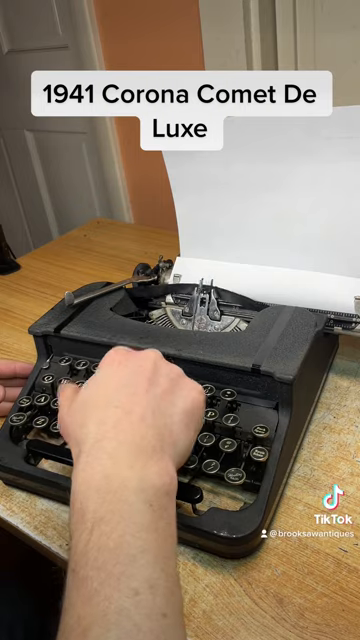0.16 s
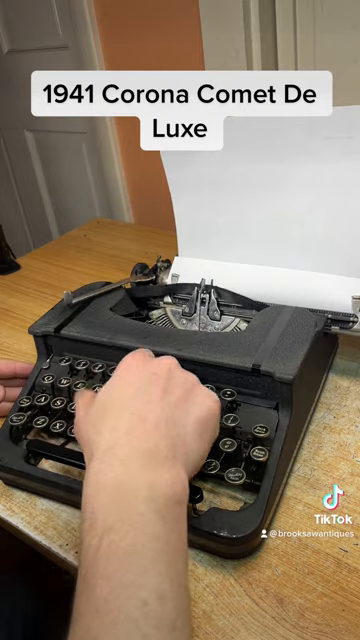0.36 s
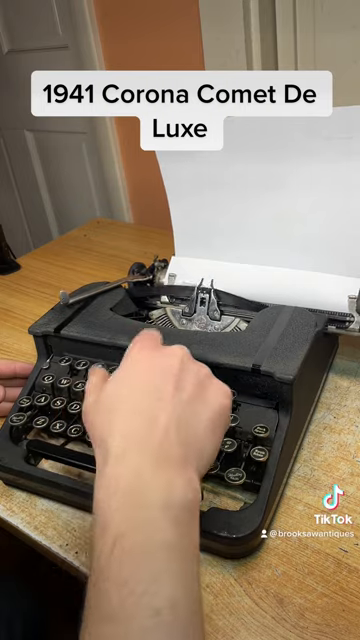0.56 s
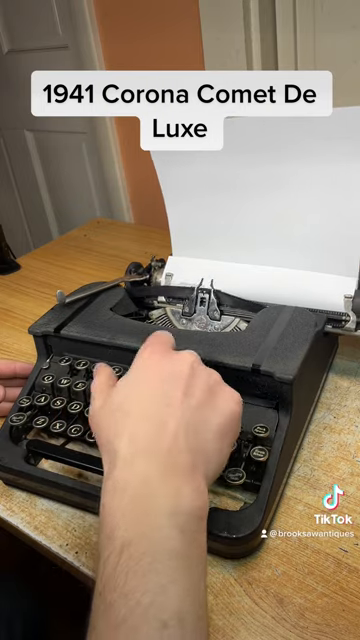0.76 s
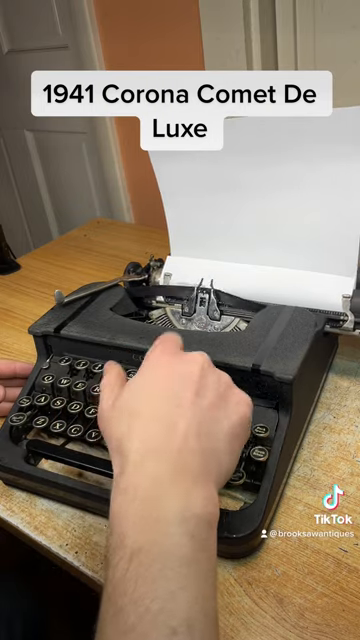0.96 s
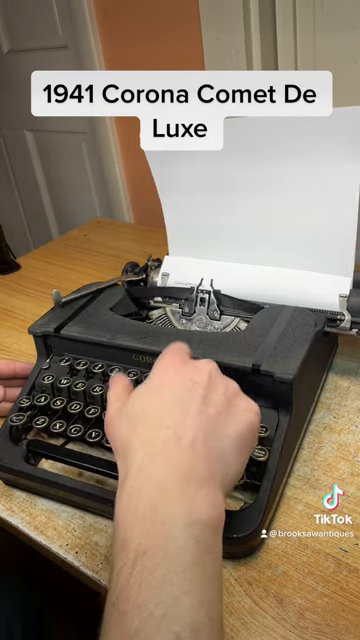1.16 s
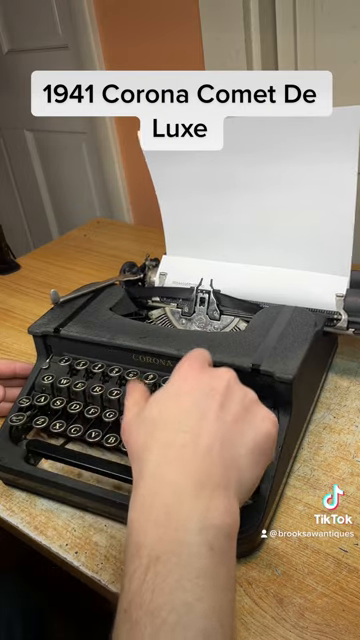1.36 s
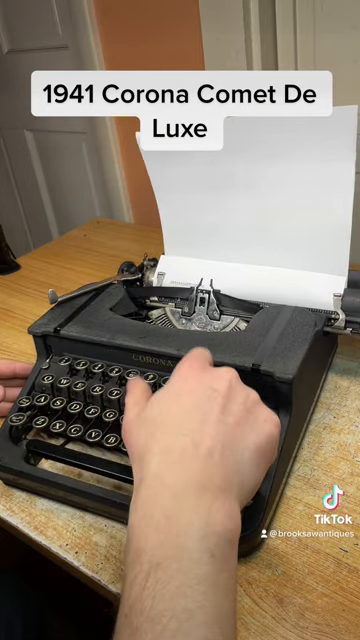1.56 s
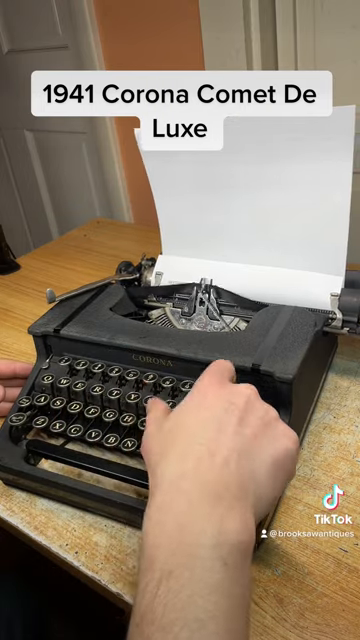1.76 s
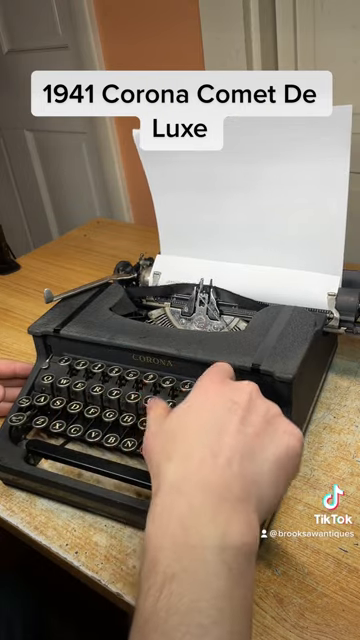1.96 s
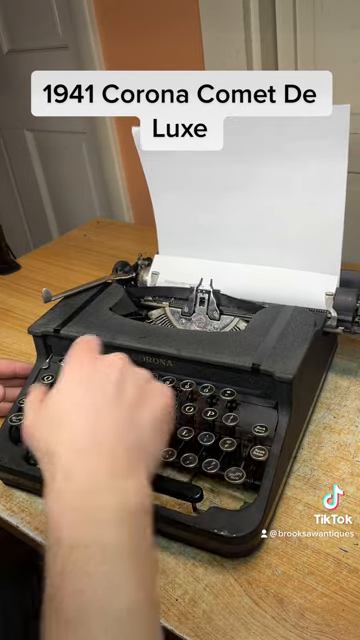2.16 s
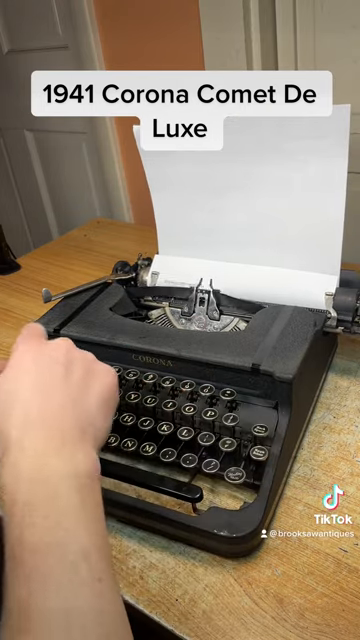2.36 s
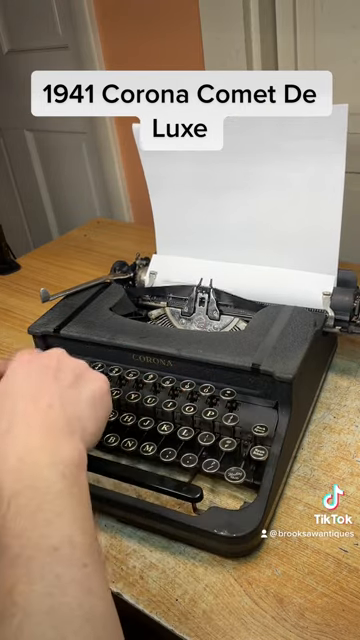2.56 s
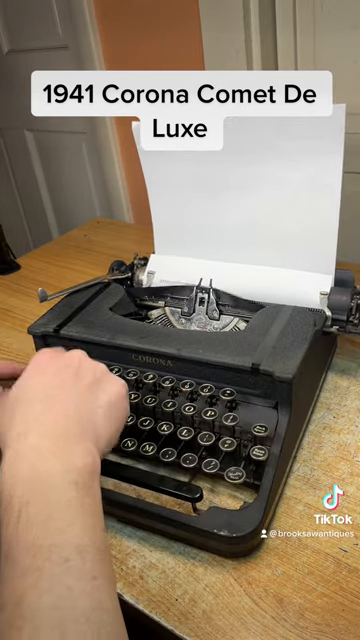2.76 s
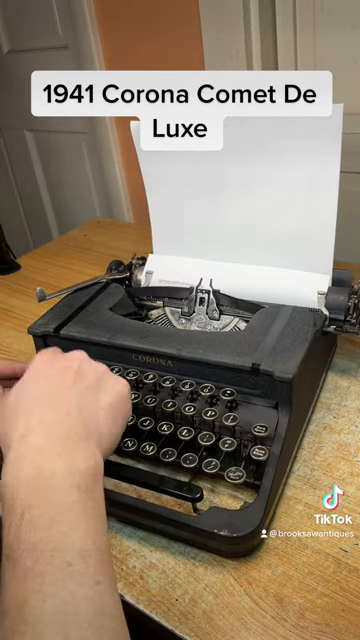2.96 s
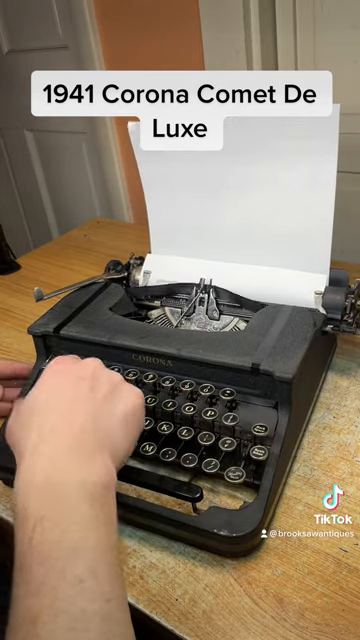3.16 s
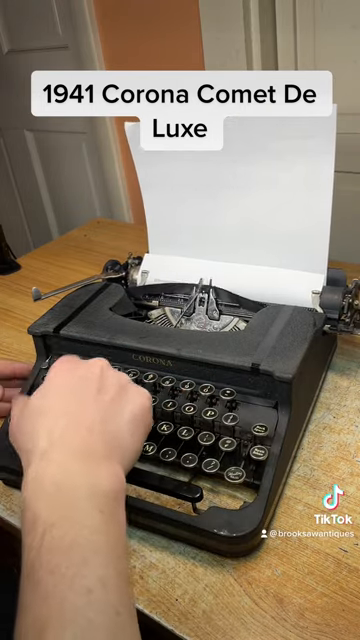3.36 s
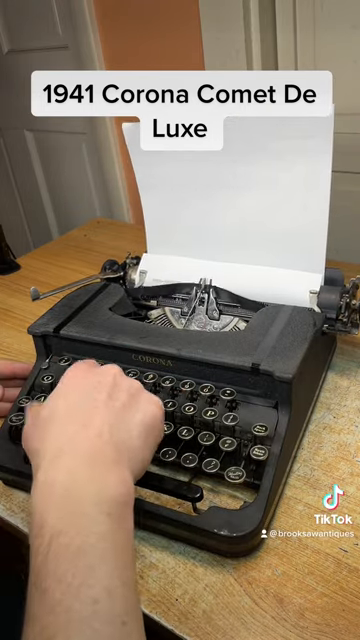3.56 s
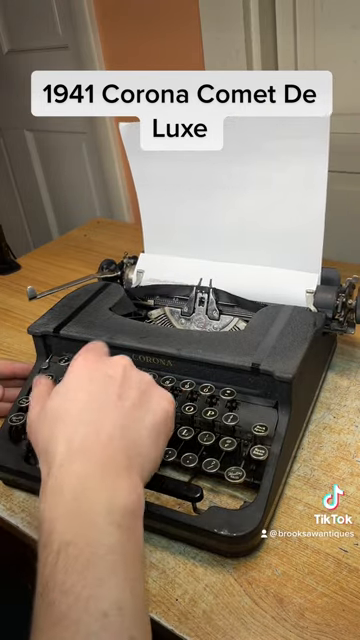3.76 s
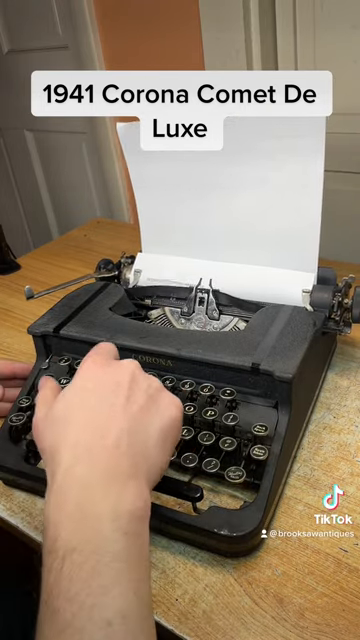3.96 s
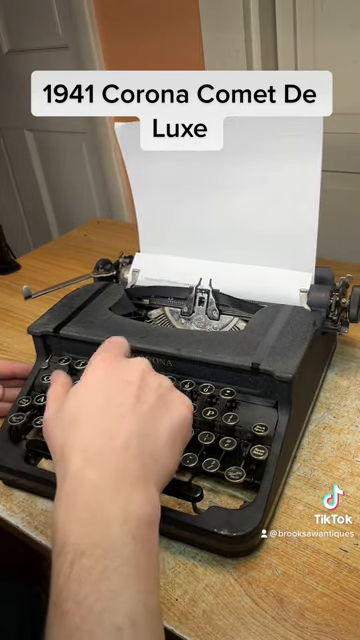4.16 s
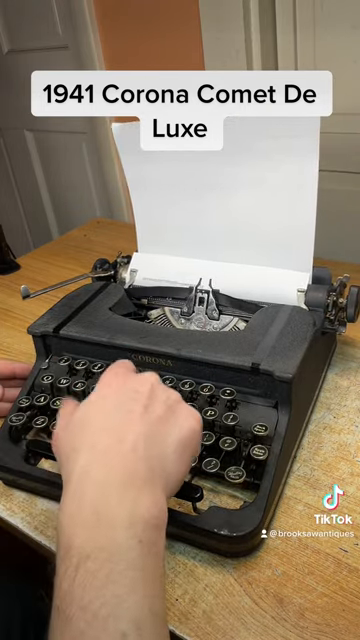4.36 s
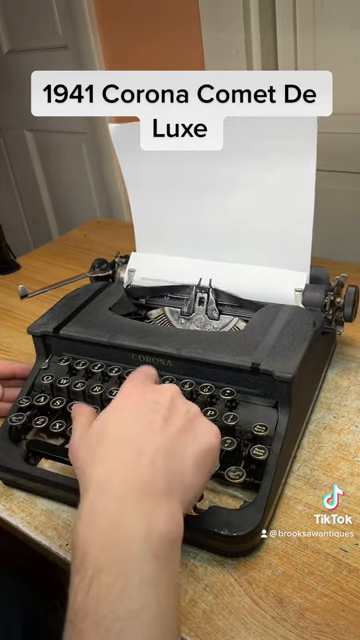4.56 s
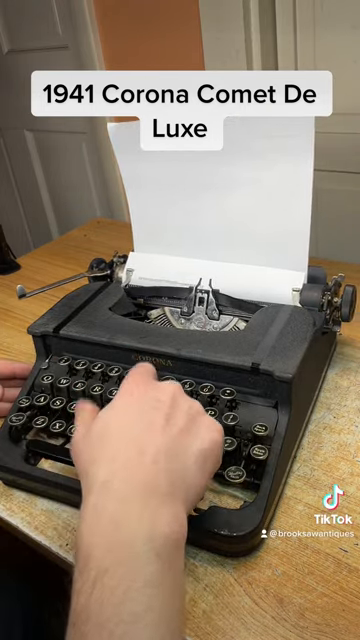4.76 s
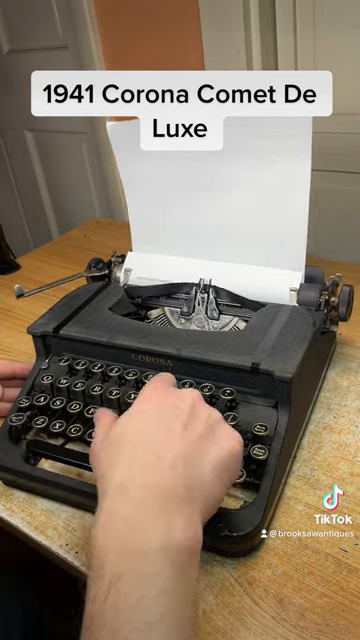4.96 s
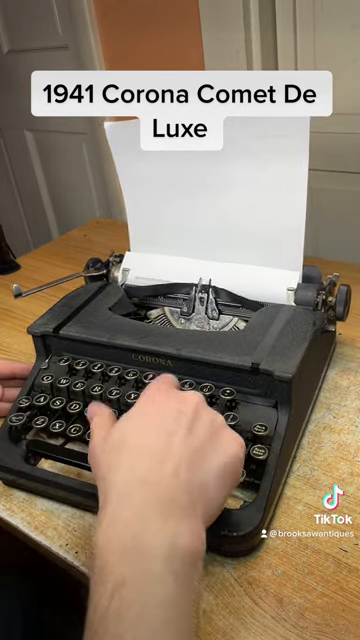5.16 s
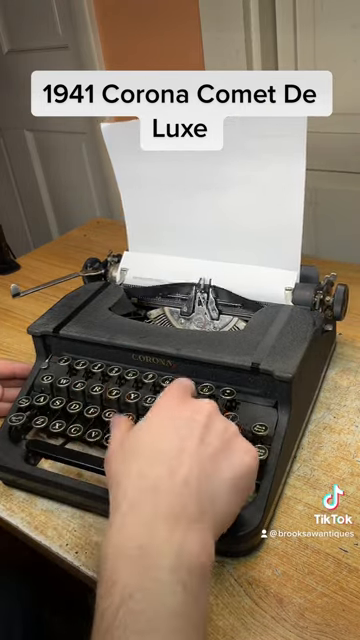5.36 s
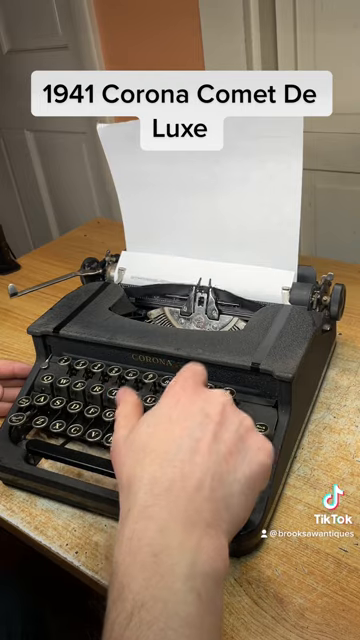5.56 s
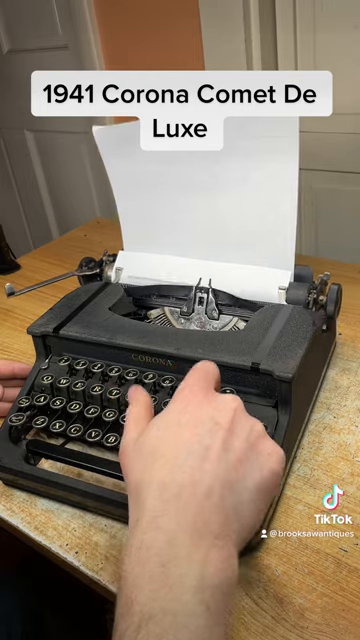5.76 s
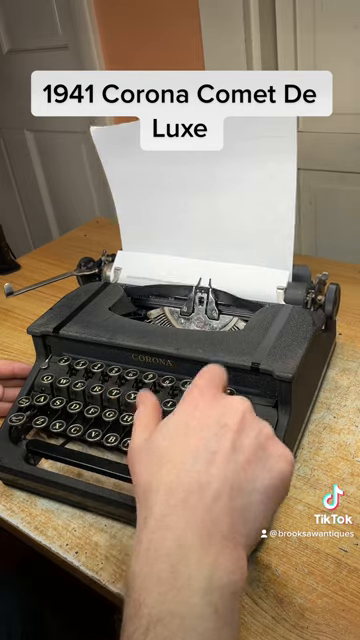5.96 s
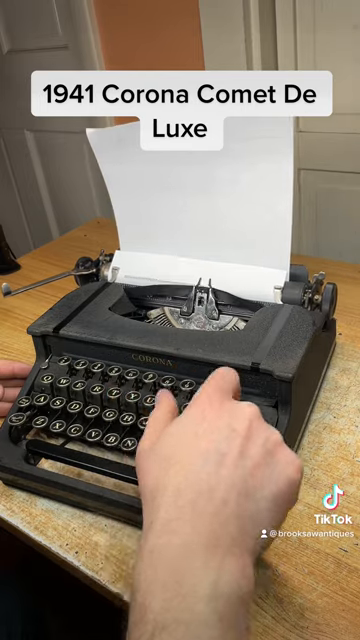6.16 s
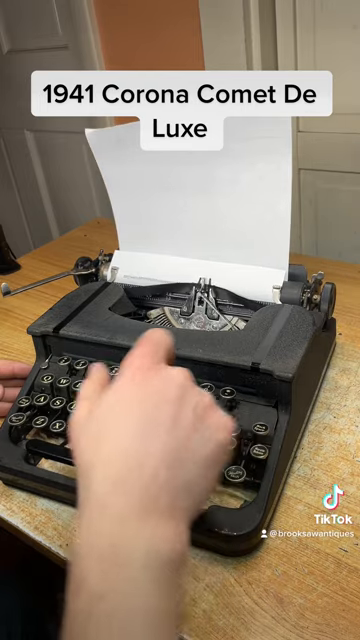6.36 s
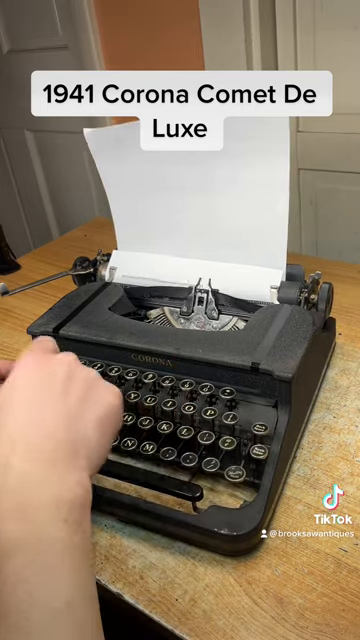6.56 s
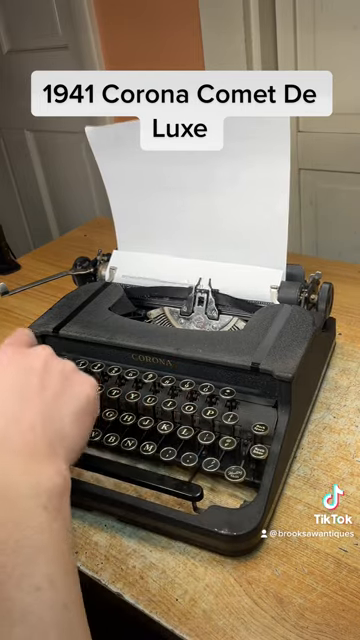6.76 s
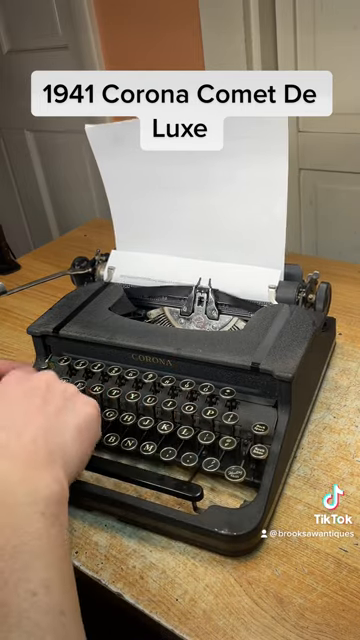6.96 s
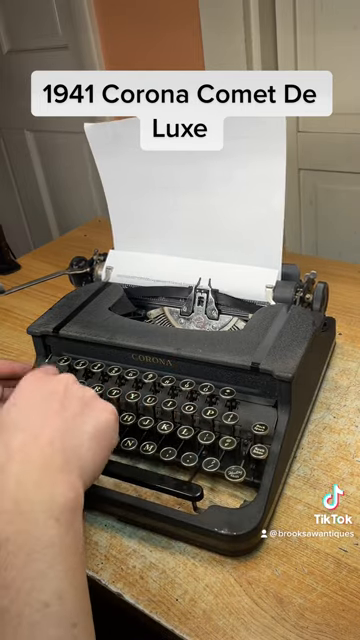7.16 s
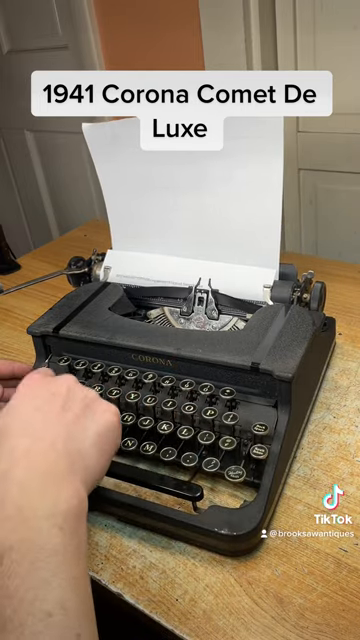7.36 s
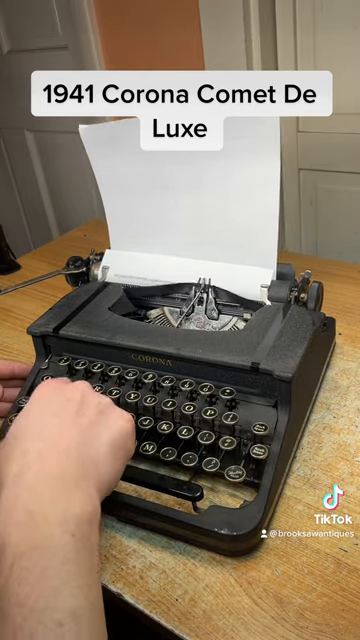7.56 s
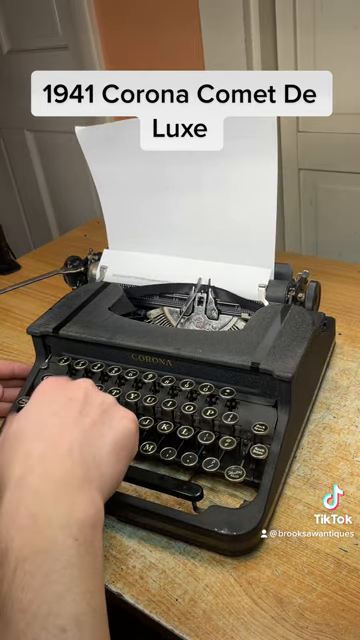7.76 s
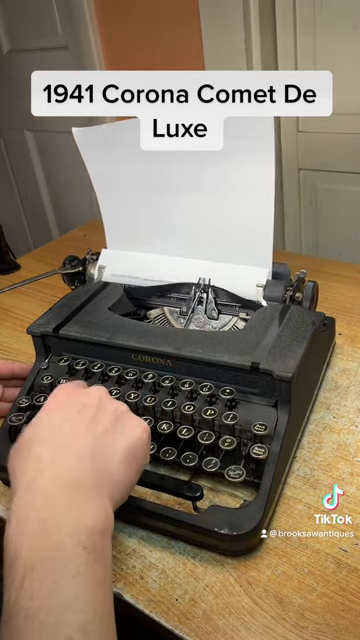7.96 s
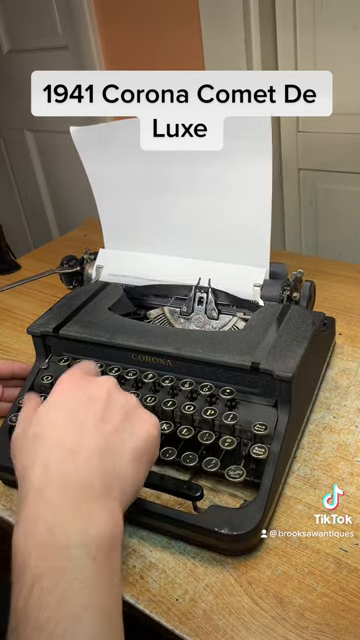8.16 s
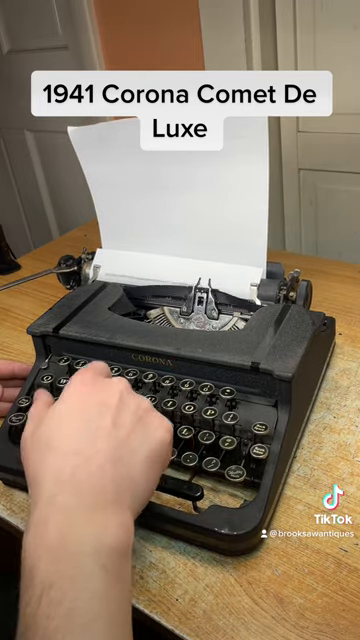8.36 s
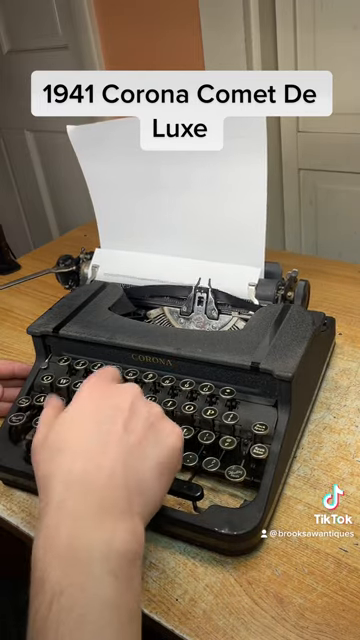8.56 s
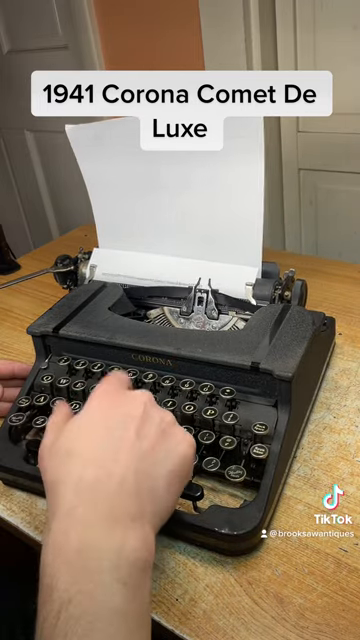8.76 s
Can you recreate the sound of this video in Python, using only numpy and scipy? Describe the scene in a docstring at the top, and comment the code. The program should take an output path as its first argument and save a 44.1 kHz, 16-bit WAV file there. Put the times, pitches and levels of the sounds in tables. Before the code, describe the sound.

An old portable manual typewriter is typed steadily in a quiet room, sharp metallic clacks with rattling type bars and soft frame thumps, close up.

```python
"""First an earlier stroke's rattle dies away over a quiet room and its type bar falls back with a thump.
Then a portable manual typewriter on a wooden desk is typed key after key, in runs, close to a phone.
Each stroke: the lever clicks, rubs and bottoms, the slug cracks on the platen and bounces, the linkage
rattles out, the bar falls back on its rest and thumps the frame. Contacts are filtered random grains;
steel, platen and frame are damped sines. Room tone is coloured noise, with two low motor tones."""
import sys
import numpy as np
from scipy import signal
from scipy.fft import rfft, irfft, next_fast_len
from scipy.io import wavfile
from scipy.ndimage import uniform_filter1d

SR = 44100
rng = np.random.default_rng(int(sys.argv[2]) if len(sys.argv) > 2 else 0)


def dump(signal):
    """Clip the signal to [-1, 1] and save it as 16-bit WAV at the path in sys.argv[1]."""
    limited = np.clip(np.atleast_2d(signal).T, -1, 1)
    pcm = np.round(limited * 32767).astype(np.int16)
    wavfile.write(sys.argv[1], SR, pcm)


N = 388962


def from_db(db):
    """Decibels to amplitude factor."""
    return 10 ** (np.asarray(db) / 20)


def at_hz(points, hz):
    """Read a (freq_hz, value) table along log frequency."""
    table = np.array(points)
    return np.interp(np.log(hz + 1), np.log(table[:, 0] + 1), table[:, 1])


def colour(x, spectrum, size=4096):
    """Minimum-phase filter with the given (freq_hz, gain_db): nothing sounds early."""
    points = [(5, -90)] + list(spectrum) + [(22050, -60)]
    gain_db = at_hz(points, np.fft.rfftfreq(size, 1 / SR))
    cepstrum = irfft(np.log(from_db(gain_db)))
    # fold the cepstrum onto positive time
    cepstrum[1:size // 2] *= 2
    cepstrum[size // 2 + 1:] = 0
    impulse = irfft(np.exp(rfft(cepstrum)))
    return signal.oaconvolve(x, impulse[None], axes=1)[:, :N]


def pulses(times_s, gains):
    """One sample per event."""
    out = np.zeros(N)
    index = np.round(np.asarray(times_s) * SR).astype(int)
    np.add.at(out, np.clip(index, 0, N - 1), gains)
    return out


def envelope(times_s, level_db, rise_s, t60_s):
    """Each event swells with time constant rise_s and dies with t60_s."""
    t = np.arange(int(.5 * SR)) / SR
    shape = (1 - np.exp(-(t + 1 / SR) / rise_s)) * from_db(-60 * t / t60_s)
    return signal.oaconvolve(pulses(times_s, from_db(level_db)), shape / shape.max())[:N]


def grains(per_s, spread_db):
    """Uneven tiny contacts, rms 1: a shared row and an unshared row."""
    sizes = from_db(spread_db * np.minimum(rng.exponential(1, (2, N)), 5))
    signs = rng.choice([-1, 1], (2, N))
    x = sizes * signs * (rng.random((2, N)) < per_s / SR)
    return x / x.std()


def ring(x, hz, t60_s):
    """A two-pole resonator: a unit click sets a sine of height 1 ringing."""
    r = from_db(-60 / (t60_s * SR))
    w = 2 * np.pi * hz / SR
    return signal.lfilter([0, np.sin(w)], [1, -2 * r * np.cos(w), r * r], np.asarray(x) + 1e-18)


STROKE_SCATTER_DB = 2


def varied(level_db, times_s):
    """No two strokes move the parts alike: one scattered level per event."""
    return level_db + STROKE_SCATTER_DB * rng.standard_normal(len(times_s))


# distant motor: freq_hz, level_db (before HUM_GAIN_DB)
HUM = [(49.5, -51.5), (97, -58)]
HUM_GAIN_DB = 5


def hum():
    """Low tones whose phase wanders slowly, as smoothed noise accumulates."""
    smooth = uniform_filter1d(rng.standard_normal((len(HUM), N)), size=2000)
    wander = np.cumsum(smooth, axis=1) * .012
    out = np.zeros(N)
    for (hz, level_db), phase in zip(HUM, wander):
        out += from_db(level_db + HUM_GAIN_DB) * np.sin(2 * np.pi * hz * np.arange(N) / SR + phase)
    return out


# quiet-room spectrum: freq_hz, gain_db
ROOM_TONE = [(18, -13), (30, -6), (54, -15.5), (66, -14.5), (76, -20.5), (180, -14), (234, -18.5),
             (526, -32.5), (592, -25.5), (684, -33.5), (1860, -44), (9000, -64.5), (11700, -107),
             (19800, -120)]
ROOM_TONE_DB = -50


def room_tone():
    """Steady noise, mostly low rumble."""
    tone = colour(rng.standard_normal((2, N)), ROOM_TONE, size=8192)
    return from_db(ROOM_TONE_DB) * tone / tone.std()


ROOM_T60_S, WALL_CUT_HZ = 0.41, 416
ROOM_DB = -9  # before the walls dull the answer


def room(x):
    """The room answers with decaying noise, one per row, duller than the source."""
    t = np.arange(int(.6 * SR)) / SR
    answer = rng.standard_normal((2, len(t))) * from_db(-60 * t / ROOM_T60_S) * (t > .004)
    answer /= np.sqrt(np.sum(answer[0] ** 2))
    pole = np.exp(-2 * np.pi * WALL_CUT_HZ / SR)
    answer = signal.lfilter([1 - pole], [1, -pole], answer)
    return from_db(ROOM_DB) * signal.oaconvolve(x[None], answer, axes=1)[:, :N]


CLINKS_PER_S, CLINK_T60_S = 400, 0.013


def clinks(shake):
    """Loose steel parts touch now and then; each touch rings briefly at one of ten pitches."""
    touches = shake * grains(CLINKS_PER_S, 2.13)
    dealt = rng.integers(0, 10, N)
    pitches_hz = np.geomspace(1500, 7000, num=10)
    return sum(ring(touches * (dealt == k), hz, CLINK_T60_S) for k, hz in enumerate(pitches_hz))


# an earlier stroke's falling bar: fall_s, thump_db
EARLIER_FALL = (.063, -42.5)


def falls():
    """Times and thump levels of the bars dropping back."""
    own = [(hit_s + fall_after_s, thump_db) for hit_s, _, _, fall_after_s, thump_db in STRIKES]
    return np.transpose([EARLIER_FALL] + own)


# lever levels in each run of keys: start_s, click_db, rub_db, clatter_db (falling bar)
RUNS = [(0, -43.5, -36.5, -37.5), (2.2, -35.5, -40, -38), (6.6, -33, -43, -41)]


def of_run(times_s, column):
    """The value that the current run of keys gives at each time."""
    runs = np.array(RUNS)
    return runs[np.searchsorted(runs[:, 0], times_s) - 1, column]


# a key starts down at the very end: start_s, click_db
LAST_PRESS = (8.797, -35.5)
PRESS_LEAD_S, BOTTOM_LEAD_S, TRIP_LEAD_S = 0.035, .02, 0.0068  # before the slug lands
RUB_AFTER_S = 0.016  # after the press
RELEASE_LEAD_S = 0.043  # before the bar falls
BOTTOM_TICK_DB, TRIP_DB, RELEASE_DB = -43.5, -35.5, -45.5


def key_motion():
    """Envelope of the key: click, rub, bottom tick, escapement trip; the finger lets go before the fall."""
    hit_s = np.transpose(STRIKES)[0]
    press_s = hit_s - PRESS_LEAD_S
    fall_s = falls()[0]
    out = envelope(press_s, varied(of_run(press_s, 1), press_s), 0.0027, 0.12)
    out += envelope(press_s + RUB_AFTER_S, of_run(press_s, 2), 0.019, 0.23)
    out += envelope([LAST_PRESS[0]], LAST_PRESS[1], 0.0022, 0.2)
    out += envelope(hit_s - BOTTOM_LEAD_S, varied(BOTTOM_TICK_DB, hit_s), 0.0006, 0.017)
    out += envelope(hit_s - TRIP_LEAD_S, varied(TRIP_DB, hit_s), 0.00087, 0.059)
    return out + envelope(fall_s - RELEASE_LEAD_S, varied(RELEASE_DB, fall_s), .003, 0.22)


# lever and bar contact spectrum: freq_hz, gain_db
LEVERS = [(300, 14), (700, 2.5), (1400, -2), (2500, -5.5), (5000, -5), (8000, -10), (11000, -11),
          (12500, -14), (15500, -20.5)]
PAD = [(300, -6.0), (700, 6.5), (1500, -2.5), (2500, -10.5)]  # freq_hz, gain_db
CLATTER_LEAD_S, TICK_LEAD_S, PAD_LEAD_S = 0.018, .003, 0.007  # before the bar falls back
TICK_BELOW_DB, PAD_DB = 2, -35.5


def levers():
    """Key levers click and rub; bars clatter back, tick steel on steel and land on a padded rest."""
    fall_s = falls()[0]
    clatter_db = of_run(fall_s, 3)
    clatter = envelope(fall_s - CLATTER_LEAD_S, clatter_db, 0.0077, 0.18)
    tick = envelope(fall_s - TICK_LEAD_S, varied(clatter_db - TICK_BELOW_DB, fall_s), 0.001, 0.054)
    pad = envelope(fall_s - PAD_LEAD_S, varied(PAD_DB, fall_s), 0.0025, 0.2)
    motion = key_motion() + clatter
    contacts = motion * grains(3500, 2.37)
    out = colour(contacts + from_db(-19.5) * clinks(motion), LEVERS)
    out += colour(tick * grains(3500, 3.5), RATTLE)
    out += colour(pad * grains(1500, 2.1), PAD)
    # the rubbing shakes the frame too
    for hz, _, key_db, _, t60_s in FRAME:
        out += from_db(key_db - 30.5) * ring(contacts, hz, t60_s)
    return out


# jangling steel spectrum: freq_hz, gain_db
RATTLE = [(300, -5.5), (900, -6), (2200, -10), (3100, -3), (4200, 1), (7000, 1), (10500, -7.5),
          (12500, -17.5), (15500, -40)]
RATTLE_DB, RATTLE_TAIL_DB, EARLIER_RATTLE_DB = -23, -26.5, -37.5


def linkage():
    """After the blow the bars jangle out; an earlier stroke is still dying away at the start."""
    hit_s = np.transpose(STRIKES)[0]
    shake = envelope(hit_s + 0.00066, RATTLE_DB, 0.00095, 0.023)
    shake += envelope(hit_s + 0.0022, RATTLE_TAIL_DB, 0.003, 0.18)
    shake += envelope([0], EARLIER_RATTLE_DB, .001, 0.18)
    return colour(shake * grains(3500, 1.5) + from_db(-20.5) * clinks(shake), RATTLE)


# frame and desk modes: freq_hz, slug_db, key_db, falling_bar_db, t60_s
FRAME = [(93, -14.5, -8, -8, 0.076), (149.3, -9, -5, -0.5, 0.18), (156, -6, -4.5, -12, 0.14),
         (182.5, -12, -8, 3, 0.14), (279.9, -22, -7.5, -2.5, 0.19), (298.1, -14, -10, 5.5, 0.18),
         (351, -16, -10.5, 5.5, 0.16), (462, -38, -9, -3, 0.075), (627, -28, -16.5, -15, 0.037)]
# the platen's short pop: freq_hz, level_db, t60_s
POP = [(439, -1, 0.021), (763, -5, .015), (1412, -8.5, .015)]
SLUG_THUD_DB, KEY_THUD_DB, POP_DB = -38.5, -37, -25
THUD_S, POP_S = .0035, 0.00178  # after the slug lands
THUMP_AFTER_S = 0.00809  # after the bar falls back


def frame():
    """Slugs, keys and falling bars push the frame's modes; levels scatter, key and bar timing too."""
    hit_s = np.transpose(STRIKES)[0]
    fall_s, thump_db = falls()
    # times, level_db, scatter_s
    pushes = [(hit_s + THUD_S, varied(SLUG_THUD_DB, hit_s), 0),
              (hit_s - BOTTOM_LEAD_S, varied(KEY_THUD_DB, hit_s), .0012),
              (fall_s + THUMP_AFTER_S, thump_db, .002)]
    out = np.zeros(N)
    for kind, (push_s, level_db, scatter_s) in enumerate(pushes):
        chance = rng.normal(0, 1, (len(push_s), len(FRAME), 2))
        for k, (hz, *mode_db, t60_s) in enumerate(FRAME):
            gains = from_db(level_db + mode_db[kind] + 2.2 * chance[:, k, 0])
            out += ring(pulses(push_s + scatter_s * chance[:, k, 1], gains), hz, t60_s)
    pop = pulses(hit_s + POP_S, from_db(varied(POP_DB, hit_s)))
    for hz, level_db, t60_s in POP:
        out -= from_db(level_db) * ring(pop, hz, t60_s)
    return np.array([out, np.roll(out, 331)])  # unshared row: 7.5 ms later


# type bar, platen and cover modes: freq_hz, level_db at each of four carriage marks, t60_s
STEEL = [(3240, -33, -35.5, -36, -24, 0.019), (3420, -40, -20.5, -21.5, -21, 0.017),
         (3998, -36.5, -23.5, -28.5, -23, 0.029), (4286, -25.5, -26.5, -35.5, -23, 0.024),
         (4276, -21.5, -21.5, -33.5, -31, 0.056), (4716, -21, -21, -15.5, -26.5, 0.019),
         (5104, -24.5, -28, -19.5, -25.5, 0.027), (5390, -22.5, -20.5, -14, -20.5, 0.023),
         (5540, -36.5, -36, -28, -18, 0.018), (6060, -26, -25.5, -44, -14, 0.029),
         (6930, -28, -10, -17, -13.5, .015), (7100, -35, -6.5, -35.5, -17, 0.0081),
         (7270, -24.5, -13, -25, -25, 0.02), (7630, -18.5, -36, -30.5, -23, 0.015)]
# carriage marks: time_s
CARRIAGE_MARKS_S = [1.0, 3.3, 5.3, 7.8]
RING_SCATTER_DB = 1


def steel(times_s):
    """Each blow rings the same modes, a little uneven; what rings most shifts as the carriage travels."""
    out = np.zeros((2, N))
    chance = rng.standard_normal((len(times_s), len(STEEL), 2))
    for k, (hz, *mark_db, t60_s) in enumerate(STEEL):
        level_db = np.interp(times_s, CARRIAGE_MARKS_S, mark_db) + RING_SCATTER_DB * chance[:, k, 0]
        gains = (-1) ** k * from_db(level_db)
        # the unshared row takes chance signs and sizes
        out += ring([pulses(times_s, gains), pulses(times_s, gains * chance[:, k, 1])], hz, t60_s)
    return out


# strokes: hit_s, crack_db, bounce_db, fall_after_s, thump_db
STRIKES = [(0.1374, 0, -1.5, 0.1, -45), (0.3239, 5, -3.5, 0.11, -41.5), (0.4956, -4, -1, 0.11, -40.5),
           (0.6842, 0, -5, .111, -42), (0.859, 2, -4.5, 0.11, -38.5), (1.0449, -4, -3, 0.12, -38.5),
           (1.2247, -5, -2, 0.11, -39), (1.4108, -0.5, -7, 0.11, -38.5), (1.5881, 0.5, -6, .113, -38),
           (1.7819, -8, -1, 0.1, -38.5), (1.9559, -11, -3, 0.11, -39.5), (2.4164, 3, -5.5, 0.14, -49),
           (2.5938, 4.5, -12, 0.13, -39.5), (2.796, 1.5, -6, 0.12, -38.5), (2.9713, 0, -2, 0.13, -38),
           (3.1649, -23, -32, 0.11, -40), (3.338, -4, -7, 0.11, -39.5), (3.521, 1, -3, 0.11, -41),
           (3.7014, -4, -4, .11, -41.5), (3.886, -3, -5.5, 0.1, -42.5), (4.0529, -1.5, 2.5, 0.096, -45),
           (4.2336, -2.5, -5, 0.11, -46), (4.4127, -4.5, -1, .1, -43.5), (4.5963, -7, 3, 0.11, -39),
           (4.778, -9, -7, 0.11, -42), (4.9697, -1.5, -2, 0.1, -41.5), (5.1465, -3, -4, 0.098, -40.5),
           (5.3271, -15, 0, 0.11, -35.5), (5.504, -3, -6, 0.12, -38), (5.6905, -11, -10, .122, -39),
           (5.8685, -3, -4.5, .12, -39.5), (6.0542, -4.5, -8, 0.12, -51.5), (6.2204, -3, -10, 0.28, -41),
           (6.8234, 1, -15, 0.13, -45), (6.9998, -3, -7, 0.13, -41), (7.2035, 2.5, -15, 0.12, -45.5),
           (7.3821, -17, -6.5, 0.11, -44.5), (7.5687, -15, 0, 0.12, -41), (7.7488, -5, -1, 0.11, -41.5),
           (7.9324, -1, -1.5, 0.11, -44), (8.1084, -5, -6.5, 0.12, -43), (8.2983, -2.5, -10, 0.11, -39),
           (8.4718, -5, -1.5, 0.1, -41), (8.655, -3, -1.5, 0.11, -40)]
# ring as the carriage travels: time_s, paper_snap_hz, platen_knock_hz, platen_knock_db
PLATEN = [(.1, 6700, 2000, -23.5), (0.499, 6800, 2100, -26), (.68, 9030, 1980, -25),
          (1.6, 8850, 2120, -26.5), (1.78, 6580, 2640, -19.5), (2.45, 6550, 2810, -25.5),
          (2.8, 6900, 1500, -25.5), (4.8, 7050, 1814, -29), (4.97, 5170, 1720, -35), (5.5, 5430, 1770, -40),
          (5.87, 4820, 1800, -56.5), (6.05, 7970, 1824, -34), (7.58, 7660, 2580, -38),
          (7.74, 6700, 1810, -26)]
# slug crack spectrum: freq_hz, gain_db
CRACK = [(300, 4), (900, -33), (2000, -16.5), (3300, -10.5), (5000, 0), (7000, 8.5), (10500, 9),
         (12500, -2.5), (15500, -13)]
# platen knock spectrum: freq_hz, gain_db
KNOCK = [(500, -21.5), (1100, -13), (1900, 9.5), (2600, -2), (3600, -13)]
# returns from desk, paper and walls: delay_s, level_db
ECHOES = [(.0081, -15), (.0176, -19), (.0222, -18.5), (.0282, -16), (.0337, -23)]
ECHO_COLOUR = [(1500, -11.5), (4000, 3.5), (8000, -16.5), (13000, -25.0)]  # freq_hz, gain_db
BOUNCE_S, CRACK_NOISE_DB = .0021, -10


def slugs():
    """Crack and bounce are short bursts of contacts; they ring the steel, the paper and the platen."""
    hit_s, crack_db, bounce_db = np.transpose(STRIKES)[:3]
    mark_s, snap_hz, knock_hz, knock_db = np.transpose(PLATEN)
    burst = envelope(hit_s, crack_db, .0001, .008)
    burst += envelope(hit_s + BOUNCE_S, bounce_db, .0002, .011)
    blows = from_db(CRACK_NOISE_DB) * burst * grains(30000, 2.4)
    knock = envelope(hit_s, np.interp(hit_s, mark_s, knock_db), 0.00044, 0.018)
    knock = knock * grains(30000, 0.41)
    rings = np.zeros((2, N))
    for t in hit_s:
        near = slice(int(t * SR) - 10, int(t * SR) + 3000)
        rings[:, near] += from_db(-19) * ring(blows[:, near], np.interp(t, mark_s, snap_hz), .008)
        rings[:, near] += from_db(-14) * ring(knock[:, near], np.interp(t, mark_s, knock_hz), .008)
    port_gain = from_db([[0], [5]])  # the sharp blow differs more between the ports
    crack = port_gain * colour(blows, CRACK) + steel(hit_s + .0003) + rings
    echoes = np.zeros((2, N))
    for delay_s, level_db in ECHOES:
        echoes += from_db(level_db) * np.roll(crack, round(delay_s * SR), axis=1)
    return crack + colour(echoes, ECHO_COLOUR) + colour(knock, KNOCK)


# left port's phase lead: freq_hz, lead_rad
PORT_PHASE = [(0, 0), (690, -.35), (950, -.1), (1640, -.1), (2400, .3), (3100, 1.1), (4400, .3),
              (5770, 1.2), (7000, 1.8), (8200, 2.5), (9400, 2.95), (10500, 3.14), (13000, 3.2),
              (15500, 3.8)]
# port balance: freq_hz, left_minus_right_db
PORT_BALANCE = [(270, 0), (740, -2), (1220, -1.5), (2000, -.6), (9000, 0)]
# part with opposite sign at the two ports: freq_hz, gain_db
UNSHARED = [(100, -55.5), (270, -26), (700, -8), (1500, -11.5), (3000, -7.5), (6000, -11), (8500, -18),
            (12000, -36), (15500, 6.5)]


def scene():
    """Shared sound plus and minus the unshared part, then phase and balance between two ports."""
    machine = slugs() + linkage() + levers() + frame()
    heard = machine + room(machine[0]) + room_tone()
    shared = heard[0] + hum()
    unshared = colour(heard[1:], UNSHARED + [(20000, -20)])[0]
    size = next_fast_len(N + SR // 10)
    hz = np.fft.rfftfreq(size, 1 / SR)
    # each port takes half the phase and half the balance
    turn = np.exp(.5j * np.interp(hz, *np.transpose(PORT_PHASE)))
    turn = turn * from_db(at_hz(PORT_BALANCE, hz) / 2)
    spectra = rfft([shared + unshared, shared - unshared], size)
    return irfft(spectra * [turn, 1 / turn], size)[:, :N]


RUMBLE_CUT_HZ, CUTOFF_HZ, PEAK_LIMIT = 44, 16100, .84


def record(dry):
    """Rumble is filtered off, peaks are rounded, the top is cut."""
    rumble_cut = signal.butter(5, RUMBLE_CUT_HZ, "high", fs=SR, output="sos")
    top_cut = signal.cheby2(12, 70, CUTOFF_HZ, fs=SR, output="sos")
    x = signal.sosfilt(rumble_cut, dry)
    return signal.sosfilt(top_cut, PEAK_LIMIT * np.tanh(x / PEAK_LIMIT))


dry = scene()
out = record(dry)
dump(out)
```